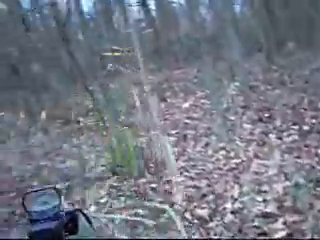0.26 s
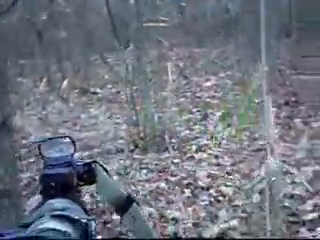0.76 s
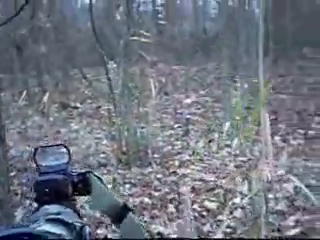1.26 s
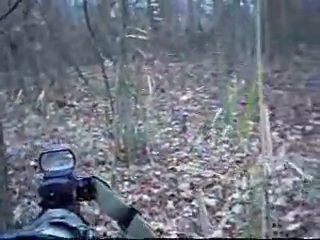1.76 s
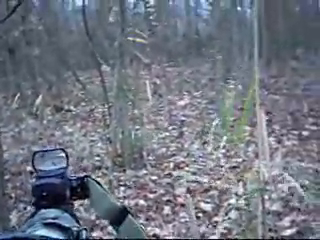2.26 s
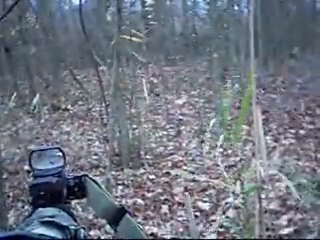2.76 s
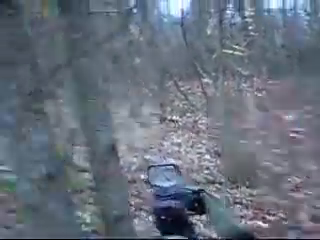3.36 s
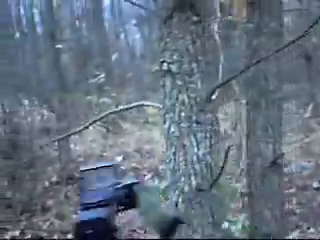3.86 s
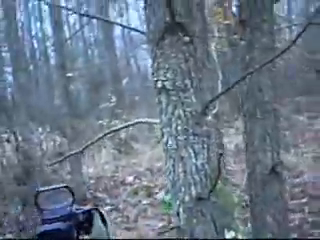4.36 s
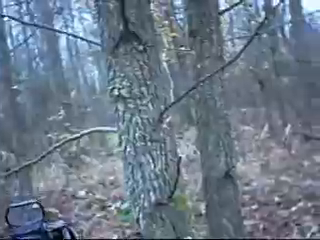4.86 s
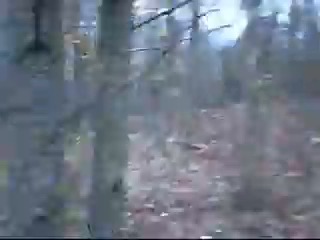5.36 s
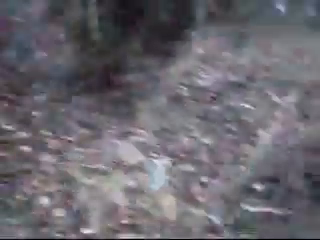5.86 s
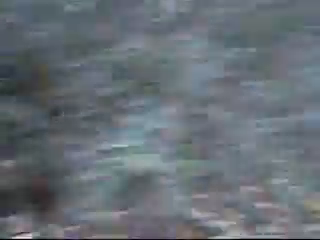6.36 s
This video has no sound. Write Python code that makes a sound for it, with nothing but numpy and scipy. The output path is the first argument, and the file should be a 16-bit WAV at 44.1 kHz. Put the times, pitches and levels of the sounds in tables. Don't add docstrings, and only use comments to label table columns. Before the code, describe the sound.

Soft wind and dry leaves, then two evenly spaced bursts of whirring, clacking air-rifle fire close by, ending in louder leaf crackle.

```python
import sys
import numpy as np
from scipy import signal
from scipy.fft import rfft, irfft, next_fast_len
from scipy.io import wavfile
from scipy.ndimage import uniform_filter1d

SR = 44100
rng = np.random.default_rng(int(sys.argv[2]) if len(sys.argv) > 2 else 0)


def wav_record(signal):
    frames = np.transpose(np.atleast_2d(signal))
    bounded = np.clip(frames, -1, 1)
    quanta = np.round(bounded * 32767).astype(np.int16)
    wavfile.write(sys.argv[1], SR, quanta)


def elevation(decibels):
    levels = np.asarray(decibels, float)
    return 10 ** (levels / 20)


N = 291051

# (t/s, level/dB)
GAIN_STEPS = [
    (0, -0.5),
    (0.8952, -9),
    (3.3, -9),
    (3.7, 0),
    (4.809, -4),
    (5.224, -7.5),
    (5.498, 12.5),
    (5.8, 0),
]
# (t/s, level/dB)
WIND_LEVEL = [(0.0, -40), (0.13, -37.5), (0.29, -27), (0.46, -26), (1.47, -39.5), (2.35, -31.5),
              (2.77, -38), (3.09, -35), (3.31, -45), (3.51, -45.5), (4.13, -39.5), (4.39, -27),
              (5.53, -40.5), (5.75, -36), (5.9, -27.5), (6.01, -25), (6.3, -41), (6.6, -45)]
# (t/s, level/dB, width/s)
WIND_BUMPS = [(0.358, -19, 0.0015), (0.645, -44, 0.0031), (0.757, -28.5, 0.0015), (3.272, -32.5, 0.0026),
              (3.396, -37, 0.0019), (3.555, -31.5, 0.0026), (3.713, -31, 0.0023), (3.834, -30.5, 0.0022),
              (3.993, -28, 0.0024), (4.114, -26.5, 0.0027), (5.648, -37.5, 0.0011), (6.314, -25, 0.002),
              (6.552, -26, 0.0021)]
# (t/s, level/dB)
LEAF_LULLS = [
    [(0.0, -50.5), (0.332, -50), (0.76, -42.5)],
    [(3.3, -50.5), (3.452, -56), (3.718, -51.5), (3.97, -43.5), (4.11, -43.5)],
    [(5.53, -49), (6.094, -44), (6.242, -38), (6.368, -37), (6.6, -32)],
]
# (f/Hz, level/dB per Hz)
LEAF_COLOUR = [(880, -2), (1500, -7), (2590, -7.5), (3620, -2), (4970, 1), (5470, -2.5), (6420, -7),
               (11000, -21), (12300, -58), (16000, -74), (22000, -120)]
# (t/s, level/dB, ring f/Hz)
SNAP_EVENTS = [(0.038, -38, 5210), (0.2982, -31, 4600), (0.4803, -23.5, 5500), (0.726, -32, 3980),
               (3.3684, -27, 4510), (3.401, -31.5, 4870), (3.632, -32.5, 5250), (3.708, -32.5, 4650),
               (3.794, -27, 5260), (3.8193, -23, 5440), (3.839, -25, 5400), (3.915, -27, 4720),
               (3.9422, -24, 4640), (3.9955, -28, 3260), (4.0343, -24, 3480), (4.0933, -21, 3800),
               (5.507, -24, 5210), (5.5882, -37, 4210), (5.637, -26, 3970), (5.7185, -20, 4160),
               (5.7914, -19, 4770), (5.8662, -18.5, 4250), (6.057, -15.5, 3850), (6.1446, -14.5, 4000),
               (6.221, -16, 4430), (6.2752, -18, 5100), (6.297, -15.5, 4600), (6.5034, -10, 4700),
               (6.5864, -11, 5130)]
# (f/Hz, level/dB per Hz)
SNAP_COLOUR = [(1000, -34), (2500, -8.5), (4500, 0.5), (6500, -10), (9000, -32.5)]
# (t/s, length/s, scrape level/dB, thud level/dB)
STRIKES = [
    (6.363, .0135, -18, -7),
    (5.488, .009, -22, -26),
    (5.446, .07, -40, -60),
    (5.432, .012, -29, -40),
    (.872, .004, -11, -14),
    (4.205, .004, -13, -24),
    (.3605, .004, -80, -19),
]
# (first shot t/s, shots, cycle/s, extra first cycle/s, extra coasting last cycle/s)
BURSTS = [
    (.8818, 29, .081845, .0073, 0),
    (4.2162, 15, .082, .0092, .0033),
]
# (spin-up/s, mesh f/Hz reached, whine level/dB, coasting from f/Hz,
# slowing/Hz per s, resting f/Hz)
MOTOR_RUNS = [
    (.106, 1600, -1.5, 1780, 15500, 300),
    (.092, 1450, -5.5, 1550, 17000, 980),
]
# (share of spin-up 0-1, share of speed reached 0-1, whine level/dB)
SPIN_UP = [(0, .33, -50), (.17, .39, -24), (.34, .66, -11), (.49, .84, -20), (.64, 1, -12.5),
           (.86, 0.96, -7), (.96, 0.99, -19)]
# (share of cycle 0-1, tooth mesh f/Hz, whine level/dB)
LOADED_CYCLE = [(.02, 1800, -40), (.12, 2430, -30), (.25, 2460, -18), (.3, 2425, -11), (.62, 2265, -11.5),
                (.72, 2120, -17), (.86, 1800, -23), (.91, 1640, -30), (.97, 1600, -36)]
# (t/s after last shot, whine level/dB)
RUN_DOWN = [(.004, -33), (.02, -26), (.04, -20.5), (.058, -27.5), (.075, -35), (.09, -56)]
# (f/Hz, level/dB per Hz)
RATTLE_COLOUR = [(250, -49), (500, -19), (900, -10), (1500, -10.5), (2300, -6), (3200, -11.5),
                 (4200, -12.5), (6000, -12), (7000, -19.5), (7900, -54), (10000, -62), (11000, -54),
                 (12200, -45), (14000, -70)]
# (f/Hz, width/Hz, level/dB)
HOUSING_MODES = [(4250, 220, -9), (4900, 200, -8), (5350, 180, -6), (6080, 200, -8)]
# (f/Hz, level/dB)
CRACK_COLOUR = [(450, -17.5), (900, -9), (2600, -10.5), (3400, -11), (5000, -7.5), (6600, -5.5),
                (7500, -12), (8500, -17), (12000, -23), (16000, -16)]
# (f/Hz, level/dB, t60/s)
BARREL_MODES = [(312, -14, 0.05), (697.3, -7.5, 0.029), (796, 2, 0.014), (1063, 3.5, 0.019),
                (1366, -18, 0.11)]
# (f/Hz, level/dB)
RASP_COLOUR = [(800, -50), (2500, -9), (4000, 0), (5200, -7.5), (7000, -0.5), (8500, -17.5), (12500, -19),
               (16000, -46)]
# (share of cycle 0-1, level/dB, ring f/Hz, t60/s)
LATCHES = [
    (.235, -13, 1500, .011),
    (.25, -15, 750, .02),
    (.74, -15, 2300, .008),
    (.865, -9, 1700, .011),
]
# (low f/Hz, high f/Hz, margin under the whole/dB)
WEAK_BANDS = [(7700, 8300, -31), (8300, 9100, -36), (8840, 10200, -45), (10230, 10600, -28.5),
              (10380, 9600, -31), (10900, 12000, -34), (10800, 14000, -38.5), (12000, 12500, -49)]


def evened(x):
    return x / np.sqrt(np.mean(x ** 2) + 1e-20)


def add(mix, s, sound):
    part = mix[round(s * SR):][:len(sound)]
    part += sound[:len(part)]


def coloured(points, count):
    hz, db = np.transpose(points)
    size = next_fast_len(count)
    shape = elevation(np.interp(np.log(np.fft.rfftfreq(size, 1 / SR) + 1), np.log(hz), db))
    return evened(irfft(rfft(rng.standard_normal(size)) * shape, size)[:count])


def wobble(hz):
    return evened(signal.lfilter(*signal.butter(2, min(hz, 9000), fs=SR), rng.standard_normal(N)))


def ring(hz, t60):
    t = np.arange(2600) / SR
    return np.sin(2 * np.pi * hz * t) * elevation(-60 * t / t60)


def gain_db():
    s, db = np.transpose(GAIN_STEPS)
    held = db[np.searchsorted(s, np.arange(N) / SR, "right") - 1]
    return uniform_filter1d(held, size=60)


def shot_times(first, count, cycle, lag, coast):
    catch_up, sag_s = .15, .00003
    k = np.arange(count - 1)
    lengths = cycle + lag * catch_up ** k + sag_s * k + coast * (k == k[-1])
    return first + np.r_[0, np.cumsum(lengths)]


def wind():
    s, level_db = np.transpose(WIND_LEVEL)
    flutter_db = -35.5 + 1.21 * (level_db + 32)
    t = np.arange(N) / SR
    slow = coloured([(8, 6.5), (25, 5.5), (60, 2.0), (100, -5.5), (200, -25), (400, -84)], N)
    fast = coloured([(40, -8), (90, -1.5), (160, -9.5), (260, -17.0), (500, -27.0), (1000, -61.0)], N)
    out = elevation(np.interp(t, s, level_db) + 5.5) * evened(slow + 0.067 * slow ** 2 - .2)
    gusts_db = 5.5 * np.clip(wobble(34), -3, 1.6) - 2.0
    return out + elevation(np.interp(t, s, flutter_db) + gusts_db) * fast


def leaf_rustle():
    s, fine_db = np.concatenate(LEAF_LULLS).T
    crunch_at_db = np.repeat([-49.5, -49.5, -51.5], [len(lull) for lull in LEAF_LULLS])
    dark_db = crunch_at_db + 0.84 * (fine_db + 45.5)
    t = np.arange(N) / SR
    contact = rng.random(N) < 500 / SR
    grains = .5 * elevation(2.8 * np.minimum(rng.exponential(1, N), 4)) * contact
    grains = signal.lfilter([1], [1, -.96], grains) + 0.6
    fine = evened(grains * coloured(LEAF_COLOUR, N))
    crunch = coloured([(200, -24), (500, -5), (1500, 0), (3000, -2), (4500, -24)], N)
    out = elevation(np.interp(t, s, fine_db) + 1.0 + 1.1 * wobble(30)) * fine
    return out + elevation(np.interp(t, s, dark_db) + 1.5 * wobble(30)) * crunch


def snaps():
    t60, tail_t60, tail_db = .013, .25, -18
    out, t = np.zeros(N), np.arange(5000) / SR
    near = t[:2600]
    for s, peak_db, hz in SNAP_EVENTS:
        db = peak_db + 0.53
        hiss = coloured(SNAP_COLOUR, 5000)
        tick = ring(hz, t60 / 3) * np.minimum(near / .0003, 1)
        tick += .25 * hiss[:2600] * elevation(-60 * near / t60)
        add(out, s, elevation(db + 4) * tick)
        add(out, s, elevation(db + tail_db) * hiss * elevation(-60 * t / tail_t60))
    return out


def wind_bumps():
    out, t = np.zeros(N), np.arange(3000) / SR
    for s, db, width in WIND_BUMPS:
        u = t / width
        push = np.exp(-(u - 1.5) ** 2)
        swing_back = 0.47 * u * np.exp(-u / 2.53)
        add(out, s, elevation(db + 14) * (push - swing_back) * np.minimum(u, 1))
    return out


def strikes():
    colour = [(300, -22), (1000, -5), (2000, -8), (4500, 0), (7000, -11), (9000, -24), (12000, -30)]
    out, t = np.zeros(N), np.arange(900) / SR
    for s, length, db, thud_db in STRIKES:
        count = round(length * SR)
        roughness = elevation(3.5 * wobble(500)[:count])
        add(out, s, elevation(db) * evened(roughness * coloured(colour, count)))
        add(out, s, -elevation(thud_db + 6) * np.exp(-t / .0012) * np.minimum(t / .001, 1))
    return out


def motor_course():
    full_cycle_s, linger_s = .0823, .06
    hush_before_s, hush_s = .0077, .0017
    rows, t = [], np.arange(N) / SR
    hush, running, eased = np.zeros((3, N))
    for burst, (lead, top_hz, lead_db, coast_hz, slowing, rest_hz) in zip(BURSTS, MOTOR_RUNS):
        times = shot_times(*burst)
        last = times[-1]
        rows += [(times[0] - lead * (1 - at), top_hz * speed, db + lead_db) for at, speed, db in SPIN_UP]
        for s, end in zip(times, times[1:]):
            luck_db = 1.1 * rng.standard_normal()
            speed = np.sqrt(full_cycle_s / (end - s))
            rows += [(s + at * (end - s), hz * speed, db + luck_db) for at, hz, db in LOADED_CYCLE]
        for s, db in RUN_DOWN:
            rows.append((last + s, max(coast_hz - slowing * s, rest_hz * (s < linger_s), 300), db))
        running += (t > times[0] - lead) & (t < last + RUN_DOWN[-1][0])
        eased += (t > last) & (t < last + .2)
        for s in times:
            add(hush, s - hush_before_s - 2 * hush_s, np.hanning(round(4 * hush_s * SR)))
    s, *columns = np.array(sorted(rows)).T
    hz, whine_db = (np.interp(t, s, c) for c in columns)
    return hz, whine_db, hush, running, eased


def gear_whine(hz, whine_db):
    loaded_hz, free_hz = 2120, 2330
    over_db = whine_db + np.interp(hz, [loaded_hz, free_hz], [-1.5, -7.5])
    low_db = whine_db - 6.5 - np.maximum(loaded_hz - hz, 0) / 47
    slack = .005 + .013 * (hz < 1650)
    turns = 2 * np.pi * np.cumsum(hz * (1 + slack * wobble(120))) / SR
    whine = elevation(whine_db + 1.8 * wobble(130)) * np.cos(turns)
    third_db = -5 - np.maximum(3 * hz - 5000, 0) / 150
    overtones = np.cos(2 * turns) + elevation(third_db) * np.cos(3 * turns)
    over = elevation(over_db + 1.6 * wobble(150)) * overtones
    low = elevation(low_db + 0.6 * wobble(120)) * np.cos(turns / 3)
    return whine + over + low


def gear_rattle(hz, hush, eased):
    full_hz, stall_hz = 1950, 620
    level_db = -14.5 + 20 * np.log10(np.minimum(hz / full_hz, 1)) - 5 * hush - 3 * eased
    level_db -= np.maximum(stall_hz - hz, 0) / 11
    housing = np.zeros(N)
    for f, width, db in HOUSING_MODES:
        mode = signal.lfilter(*signal.iirpeak(f, f / width, SR), rng.standard_normal(N))
        housing += elevation(db) * evened(mode)
    chatter = elevation(level_db + 1.8 * wobble(400))
    return chatter * evened(coloured(RATTLE_COLOUR, N) + housing) * elevation(2.0)


def gears():
    hz, whine_db, hush, running, eased = motor_course()
    sound = gear_whine(hz, whine_db) + gear_rattle(hz, hush, eased)
    return sound * uniform_filter1d(running, size=500)


def splash_db(gain, s):
    return .6 * (gain[round(s * SR)] + 10)


def piston_cracks(gain):
    out, t = np.zeros(N), np.arange(1200) / SR
    shape = np.minimum(t / .0011, 1) ** 3.5 * elevation(-60 * np.maximum(t - .0016, 0) / .0066)
    push = np.sin(np.pi * np.minimum(t / .0012, 1))
    for s in np.concatenate([shot_times(*burst) for burst in BURSTS]):
        crack_db = 10 + 2.2 * rng.standard_normal() + splash_db(gain, s)
        push_db = -12 + 2.5 * np.clip(rng.standard_normal(), -2, 1)
        add(out, s - .001, elevation(crack_db) * coloured(CRACK_COLOUR, len(t)) * shape)
        add(out, s - .0001, elevation(push_db) * push)
    return out


def overload_thuds(gain):
    out = np.zeros(N)
    for burst in BURSTS:
        times = shot_times(*burst)
        for s in times:
            db = -7.5 + 1.5 * (s == times[0]) + 3.0 * rng.standard_normal()
            add(out, s + .002, elevation(db) * ring(140, .045))
    return out * elevation(1.2 * gain)


def barrel_pops(gain):
    out, t = np.zeros(N), np.arange(1200) / SR
    shape = np.minimum(t / .0004, 1) * elevation(-60 * t / .028)
    pipe = sum(elevation(db) * ring(hz, t60) for hz, db, t60 in BARREL_MODES)
    for s in np.concatenate([shot_times(*burst) for burst in BURSTS]):
        rasp_db = -2.5 + splash_db(gain, s)
        add(out, s + .0036, elevation(rasp_db) * coloured(RASP_COLOUR, len(t)) * shape)
        add(out, s + .00383, elevation(2.5 + .5 * rng.standard_normal()) * pipe)
    return out


def latches():
    out = np.zeros(N)
    for burst in BURSTS:
        times = shot_times(*burst)
        for s, end in zip(times, times[1:]):
            for at, db, hz, t60 in LATCHES:
                u, v = rng.standard_normal(2)
                click = elevation(db + 5.5 + 1.8 * u) * ring(hz * (1 + .04 * v), t60)
                add(out, s + at * (end - s) + .0004 * v, click)
    return out


def trees(rifle):
    tail = coloured(LEAF_COLOUR, 9000) * elevation(-60 * np.arange(9000) / SR / .25)
    return elevation(-27) * signal.fftconvolve(rifle, tail / np.linalg.norm(tail))[:N]


def scene():
    gain = gain_db()
    around = wind() + leaf_rustle() + snaps() + wind_bumps() + strikes()
    around /= elevation(gain)
    motor = gears()
    blasts = piston_cracks(gain) + barrel_pops(gain) + latches()
    blasts = signal.lfilter(*signal.butter(2, 240, "high", fs=SR), blasts)
    rifle = motor + blasts + overload_thuds(gain)
    return (rifle + trees(rifle) + around)[None]


def dropouts(x):
    hz, _, z = signal.stft(x, SR, nperseg=1024)
    whole_db = 10 * np.log10((abs(z[hz > 500]) ** 2).sum(0) + 1e-12)
    for low_hz, high_hz, margin_db in WEAK_BANDS:
        band = (hz >= low_hz) & (hz < high_hz)
        band_db = 10 * np.log10((abs(z[band]) ** 2).sum(0) + 1e-12)
        weak = band_db - whole_db < margin_db + 2.5 * rng.standard_normal(len(band_db))
        z[band] *= np.where(weak, elevation(-25), 1)
    return signal.istft(z, SR, nperseg=1024)[1][:N]


def band_limit(x):
    return signal.sosfilt(signal.butter(12, 12460, fs=SR, output="sos"), x)


def record(dry):
    overloaded = np.clip(dry[0] * elevation(gain_db()), -.98, .98)
    shelf_hz, shelf_db = [0, 12300, 12700, 15500, 16000, SR / 2], [0, 0, -4, -5, -34, -40]
    shelf = signal.firwin2(255, shelf_hz, elevation(shelf_db), fs=SR)
    mix = signal.oaconvolve(dropouts(overloaded), shelf, "same")[None] - .021
    return band_limit(np.clip(mix, -1, 1))


dry = scene()
out = record(dry)
wav_record(out)
```